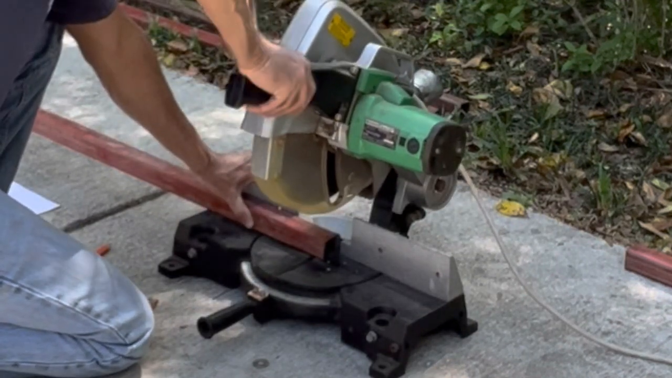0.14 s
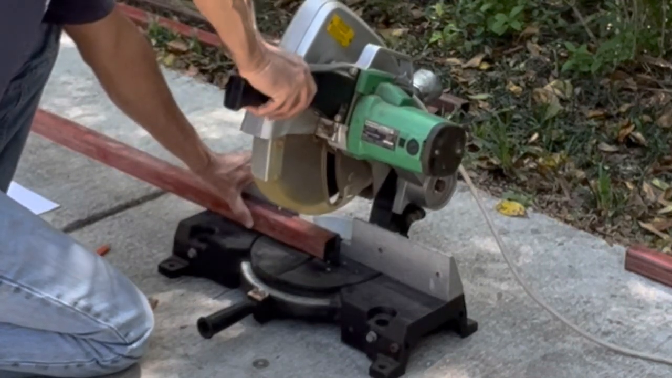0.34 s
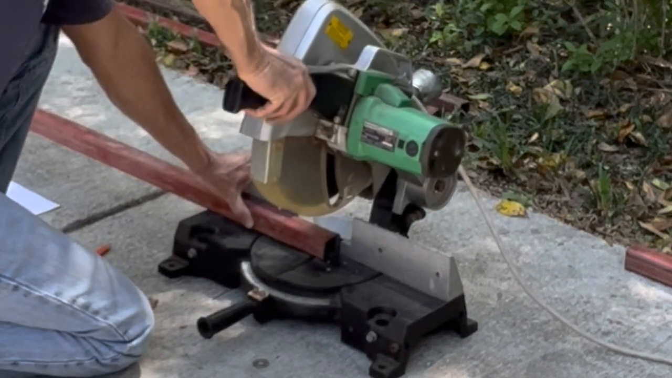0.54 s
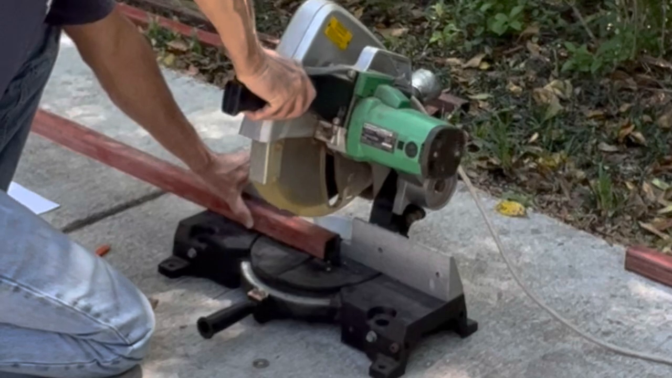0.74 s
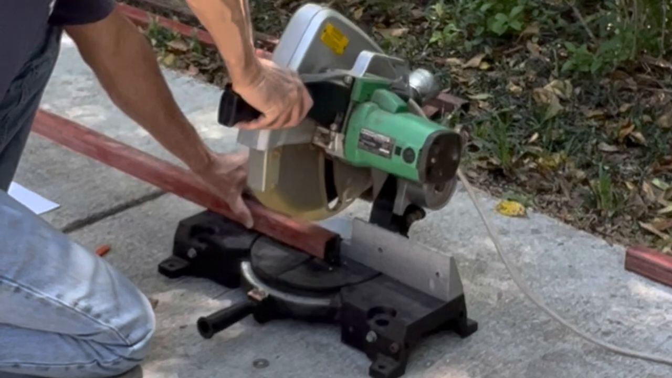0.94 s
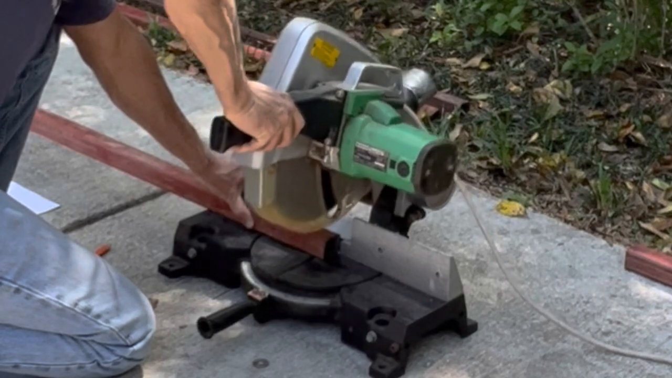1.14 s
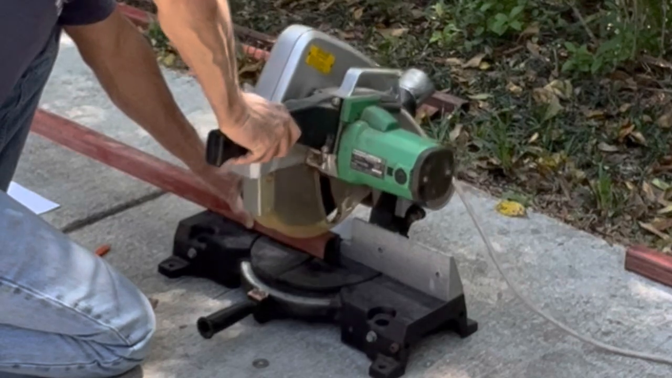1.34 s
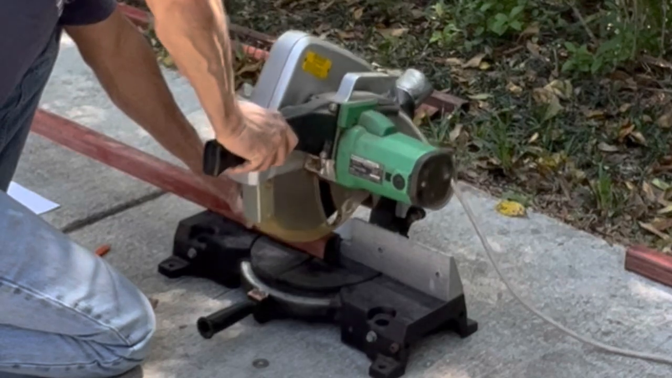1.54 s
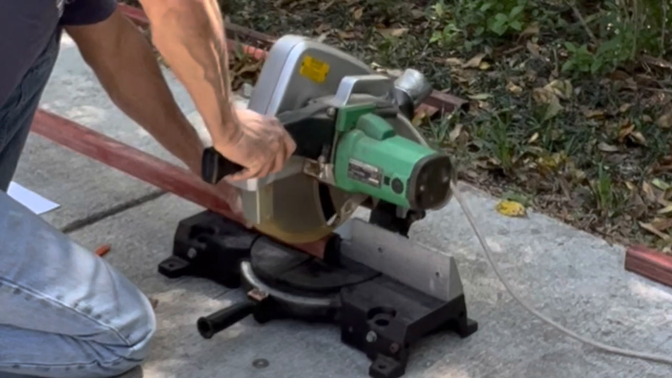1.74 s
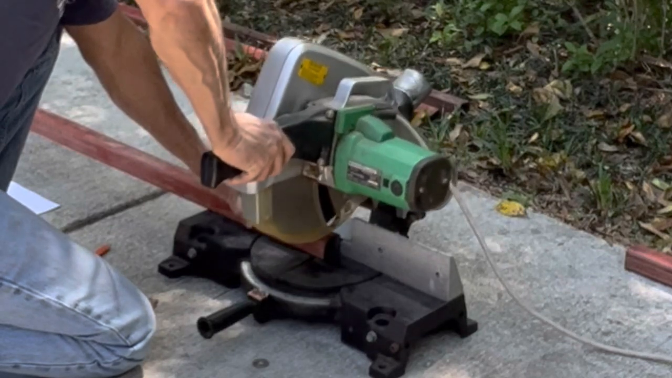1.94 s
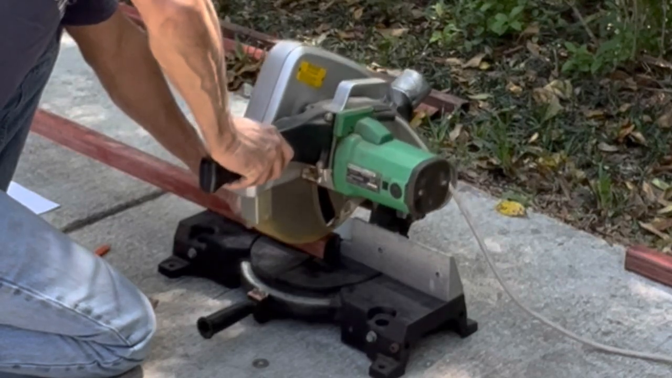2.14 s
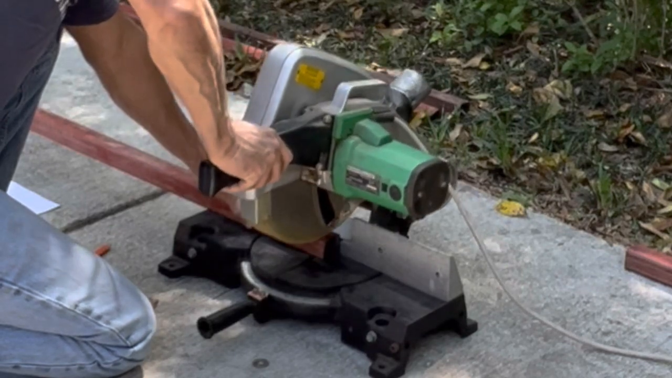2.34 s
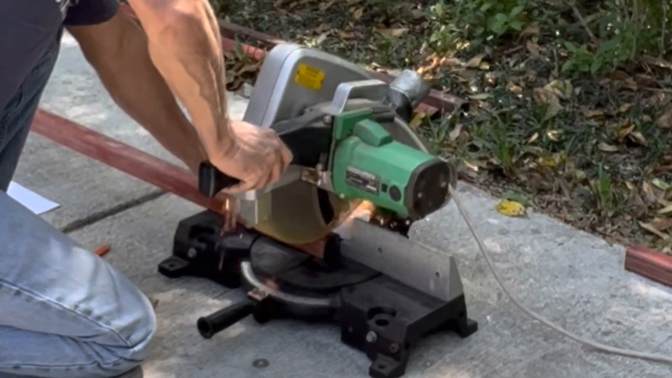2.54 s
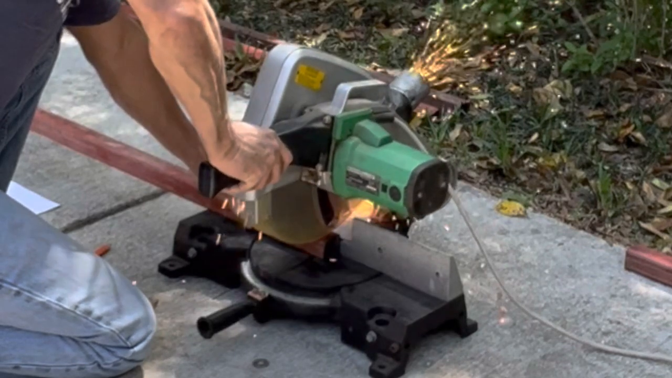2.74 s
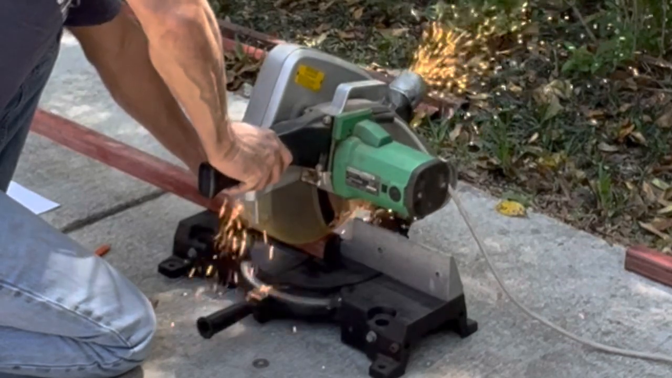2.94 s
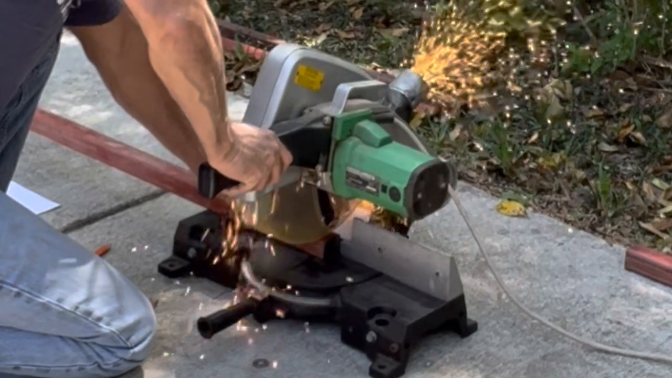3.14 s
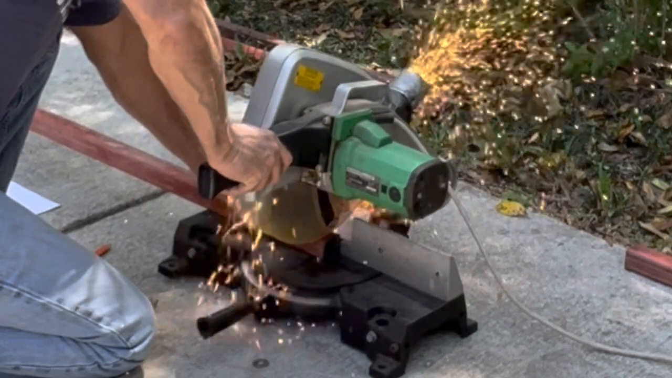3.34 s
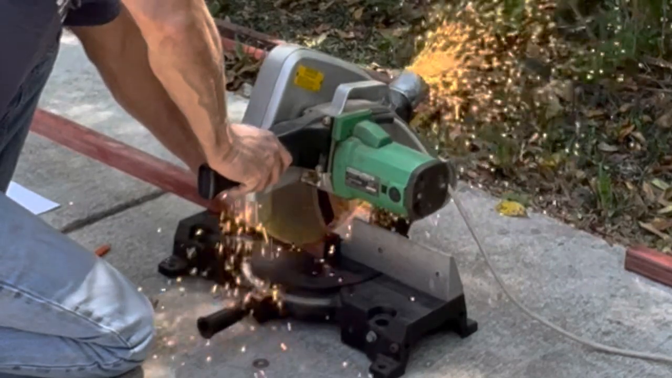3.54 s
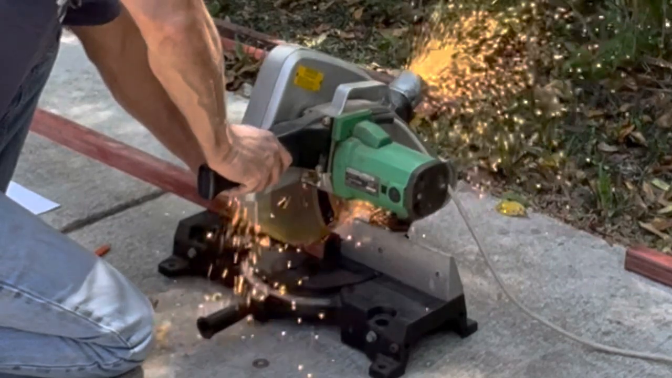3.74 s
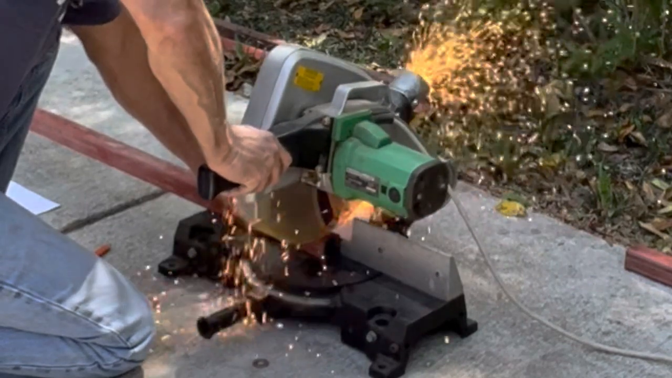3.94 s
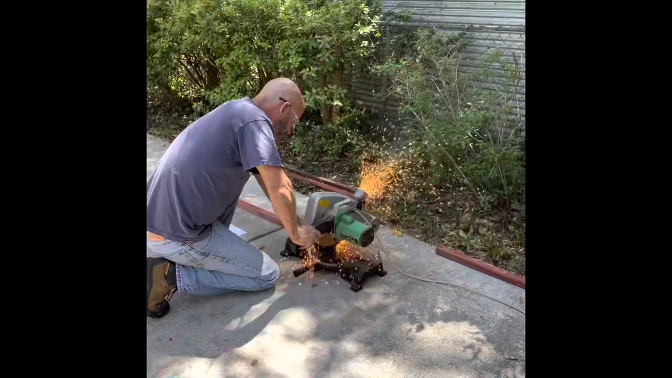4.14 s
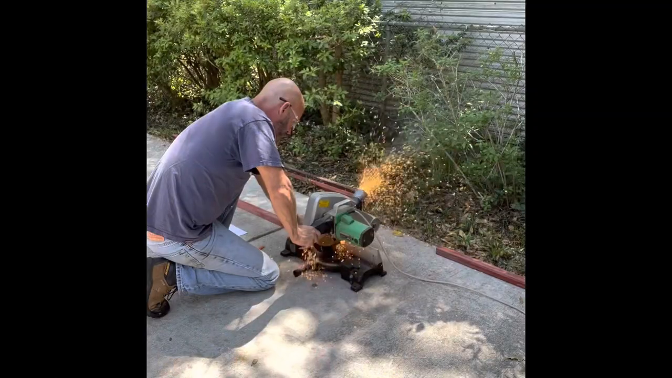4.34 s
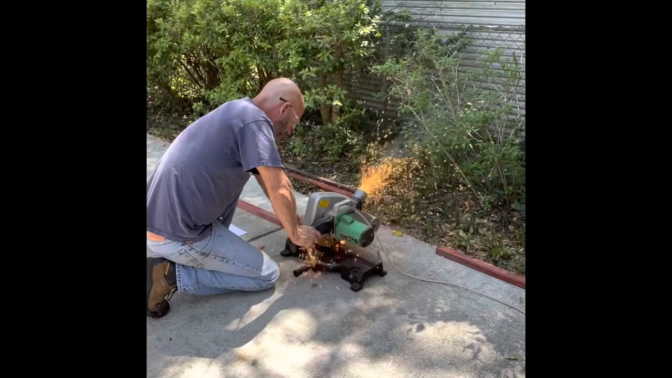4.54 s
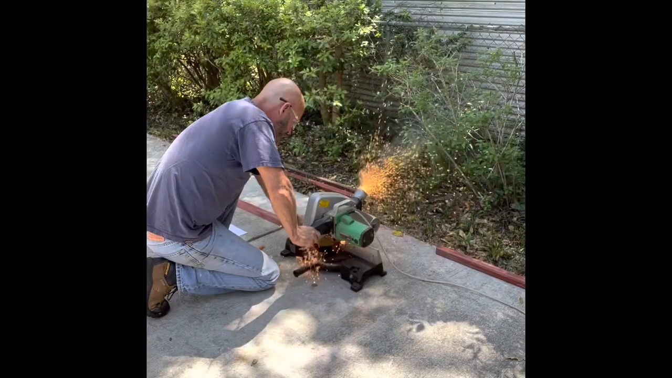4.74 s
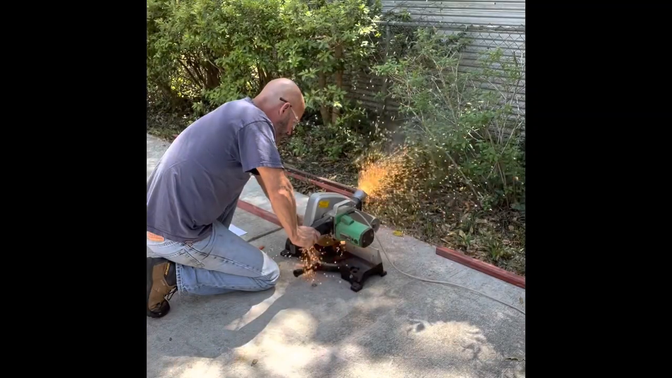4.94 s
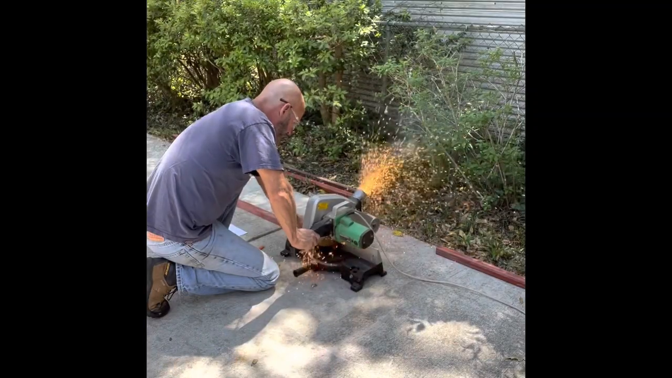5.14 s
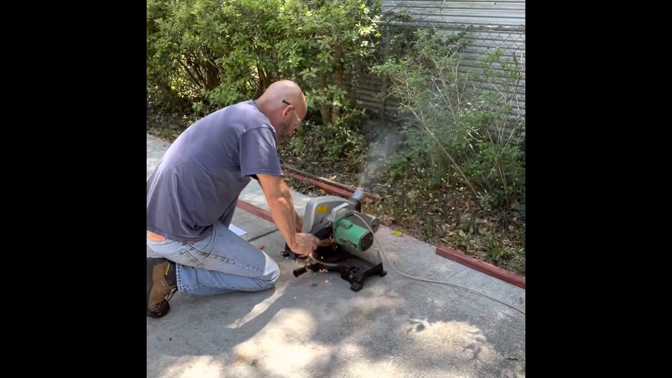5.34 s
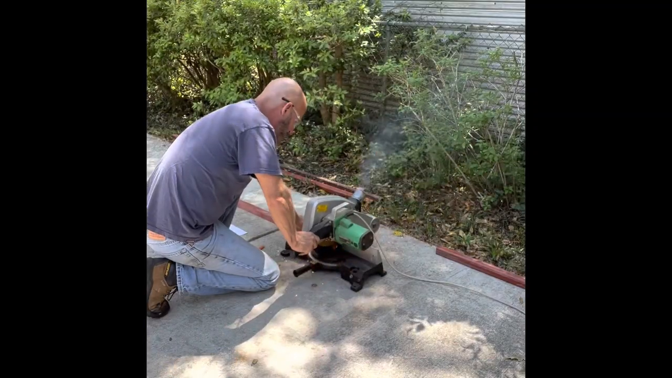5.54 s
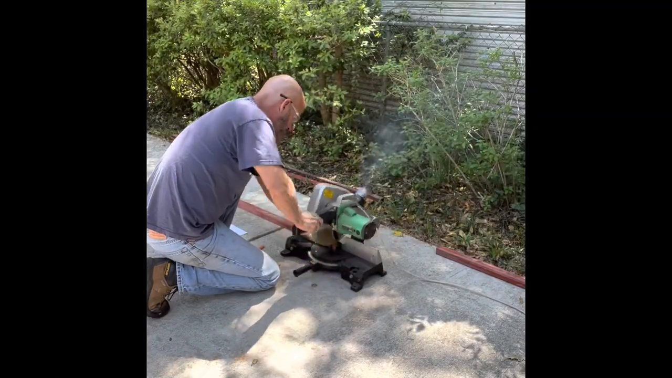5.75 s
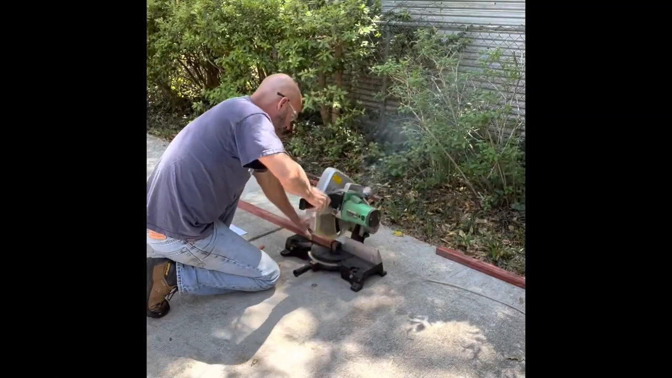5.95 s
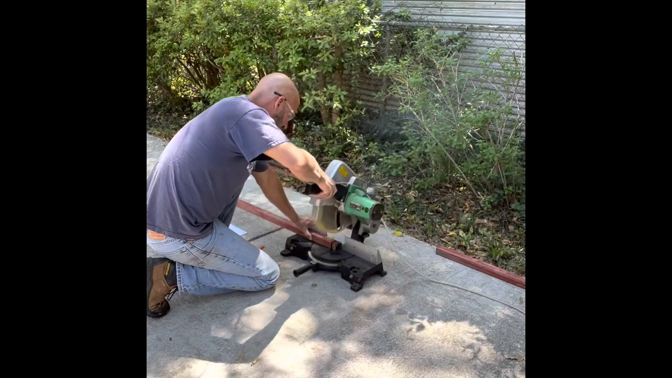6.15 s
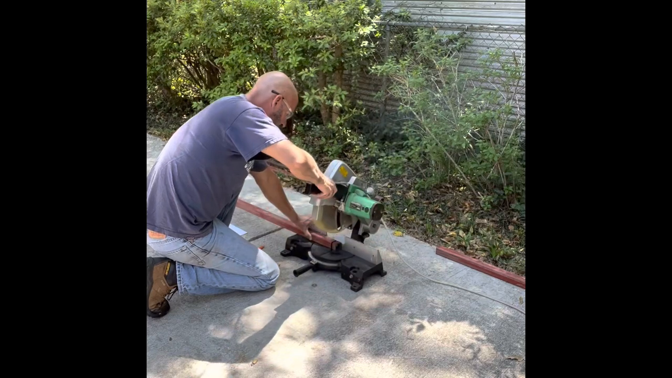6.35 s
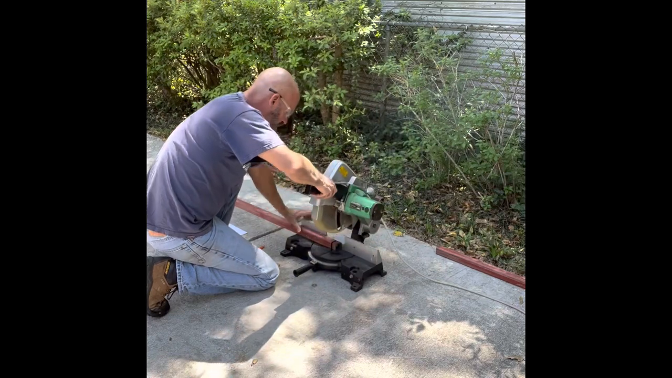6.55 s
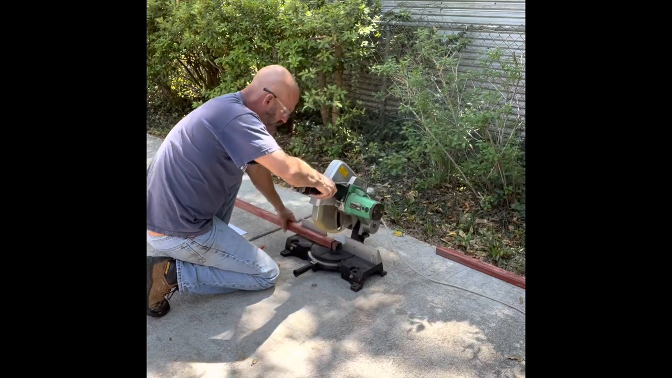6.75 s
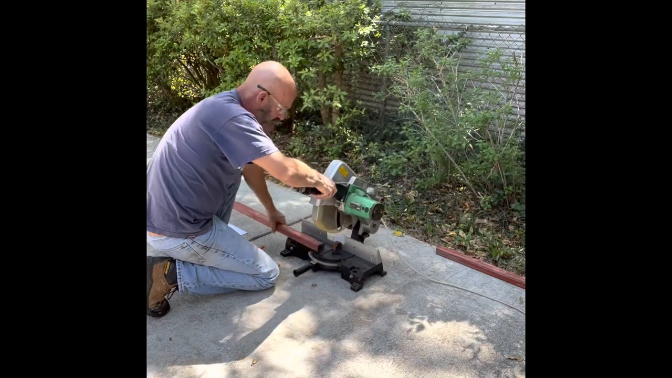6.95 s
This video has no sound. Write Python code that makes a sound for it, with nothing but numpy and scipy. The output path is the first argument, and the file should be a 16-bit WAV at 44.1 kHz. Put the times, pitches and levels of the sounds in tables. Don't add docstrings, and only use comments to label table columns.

```python
import sys
import numpy as np
from scipy import signal
from scipy.fft import rfft, irfft, next_fast_len
from scipy.io import wavfile
from scipy.ndimage import uniform_filter1d, map_coordinates

SR = 44100
rng = np.random.default_rng(int(sys.argv[2]) if len(sys.argv) > 2 else 0)


def elevation(decibels):
    levels = np.asarray(decibels, float)
    return 10 ** (levels / 20)


def bounce(signal):
    frames = np.transpose(np.atleast_2d(signal))
    limited = np.clip(frames, -1, 1)
    pcm = np.round(limited * 32767).astype(np.int16)
    wavfile.write(sys.argv[1], SR, pcm)


N = 308655
T = np.arange(N) / SR

# time_s, rumble_db
YARD = [(0.0, -47.5), (.6, -42), (.9, -58), (2.62, -66), (3.3, -53), (4.0, -60), (4.2, -47), (5.8, -35),
        (7.0, -38)]
# time_s, level_db
DRONE = [(0, -60), (.6, -51.5), (1.0, -62.5), (4.3, -55.5), (5.0, -43.5), (6.3, -44.5), (6.6, -37.5),
         (7.0, -39)]
# frequency_hz, density_db_per_hz
RUMBLE = [(13, -38.5), (22, 14.5), (102, -3.5), (116, 2), (136, -1), (252, -26), (400, -16), (520, -58),
          (880, -120)]
# frequency_hz, density_db_per_hz
LEAVES = [(120, -17), (200, -10.5), (440, -8), (1040, -10.5), (1480, -21), (3100, -26), (7180, -50),
          (12000, -40.5), (15600, -78), (22000, -120)]

# start_s, peak_db, crack_db
CLICKS = [
    (0.219, -10.5, -18),
    (0.309, -32, -33),
    (0.403, -13, -17),
    (0.569, -27, -30.5),
    (0.594, -43, -13),
    (0.624, -25, -15),
]
# frequency_hz, level_db, t60_s
HANDLE = [(1030, -6.5, 0.066), (1346, -9, 0.038), (2520, 5.5, 0.013), (2810, -6.5, 0.051),
          (4800, -15.5, 0.03), (7100, -17, 0.032)]
# start_s, peak_db, crack_db
KICKS = [(0.638, 0, -25), (0.66, -3, -19), (0.679, -6.5, -17), (0.696, -4.5, -20), (0.711, -5, -22),
         (0.732, -10.5, -17), (0.747, -10, -19.5), (0.761, -8.5, -22), (0.778, -9.5, -20.5),
         (0.8, -19, -17), (0.818, -28, -8)]
# frequency_hz, level_db
KNOCK = [(450, -12), (820, -32), (1090, 1.5), (1350, -13), (1830, -4.5)]

START_S, BITE_S, CHANGE_S, FREE_S, BRAKE_S = .63, 2.35, 4.105, 5.1, 5.73
FREE_SPEED_HZ, RECOVER_S = 383.3, 4.925
# shortfall_hz, time_constant_s
RUN_UP = [(193.9, .506), (149.9, .124)]
# speed_hz, time_constant_s
BRAKING = [(16, .035), (290, .286), (38.5, 1.5)]
# time_s, turns_hz
LOADED = [
    [(2.35, 376.5), (2.6, 366), (3.0, 337), (3.4, 293), (3.8, 257), (4.09, 245)],
    [(4.11, 178.3), (4.6, 179.6), (4.81, 180.3), (4.94, 182.3), (5.0, 187), (5.05, 197), (5.1, 212)],
]
SLOTS, HUM_ORDER, TEETH, WHEEL_TEETH = 14, 12, 9, 46

# time_s, level_db
CURRENT = [(.63, -63), (.74, -44), (.86, -35.5), (1.05, -41.5), (1.3, -53), (3.0, -67), (3.4, -41.5),
           (4.1, -59), (4.105, -24.5), (5.12, -24), (5.3, -31), (5.44, -44), (5.72, -41), (5.74, -24),
           (5.88, -29.5), (6.04, -40), (6.13, -70), (6.6, -64)]
# frequency_hz, width_hz, level_db
CASE = [(421, 58, -7), (1070, 600, 0), (1640, 112, 11), (2500, 440, 12), (3056, 266, 8.5),
        (3940, 290, 11.5)]
# frequency_hz, width_hz, level_db
HOUSING = [(438, 65, -3.5), (808, 30, 5), (1168, 300, -5), (2070, 30, -15), (2510, 78, -25),
           (3470, 95, 2.5), (4680, 390, -12.5), (5900, 160, -22)]
# frequency_hz, width_hz, level_db
LOOSE = [(400.6, 8.9, 6.5), (1050, 62, 10), (1808, 45, 11), (2780, 49, 8), (3605, 82, -1.5),
         (4640, 42, -29), (6100, 57, -28), (6700, 68, 6.5)]
# frequency_hz, density_db_per_hz
AIR = [(200, -17.5), (330, -10.5), (600, -9), (1400, -4.5), (2200, -4.5), (3000, 4), (4000, -4), (5500, -6),
       (7000, -4.5), (8500, -3.5), (10500, -10), (12500, -10), (14000, -14), (14500, -41.5)]
# frequency_hz, density_db_per_hz
COAST = [(200, -4), (330, -4), (600, -1), (1400, -5), (2200, -6.5), (3000, -13.5), (4000, -15),
         (5500, -15.5), (7000, -14), (8500, -11), (10500, -18.5), (12500, -24), (14000, -32.5),
         (14500, -44)]
# start_s, end_s, rumble_db, rumble_slope_db_per_octave, air_db, air_slope_db_per_octave
STAGES = [
    (0.652, 2.31, -23.5, 4.5, -26, 12.5),
    (5.2, 5.84, -18, 10.5, -21, 14),
    (5.833, 7.0, -24.5, 3.5, -22.5, 7),
]
PULL_HZ = 120
THROB_AT_0_DB, THROB_PER_DB = 1.54, .024
GEAR_DB, PULL_ON_HUM_DB = -12, -14.5
HUM_DB, HUM_KNEE_HZ, HUM_DB_PER_OCTAVE = -32, 330, 70
HUM_SMOTHER_DB_PER_S = -16
POWERED_AFTER_DB, HUM_AFTER_DB = 1, -2
UNLOADED_MESH_DB, UNLOADED_MESH_DB_PER_OCTAVE, UNLOADED_MESH_WIDTH_HZ = -25.5, 38, 380
JOLT_DB, JOLT_S = -10, 0.16

# start_s, extra_db, length_s
FLARES = [
    (6.081, 7, .018),
    (6.285, 7, .014),
    (6.414, 12, 0.015),
]
SLACK_DB, SLACK_RISE_S = -37, 0.027
SLACK_HOLD_S, SLACK_DB_PER_S = 6.31, -32
FIRST_TAP_DB, OVERTONE_DB_PER_OCTAVE = 3, -1.5
SHARPER_DB_PER_OCTAVE, SCATTER_DB = 5, 4
VENTS_HZ, VENTS_DB = 3300, -6

# time_s, feed_db, growl_over_hiss_db
CUTS = [
    [(2.3, -37, -20), (2.358, -22, -13.5), (2.49, -23, -4.5), (2.94, -18.5, -5.5), (3.2, -19, -5.5),
     (3.386, -21, -5.5), (3.47, -17, -7), (3.7, -21.5, -3), (4.05, -21, -4.5)],
    [(4.22, -14.5, -6.5), (4.86, -15.5, -6), (4.99, -15.5, -5), (5.03, -9, -10.5), (5.095, -7, -9.5),
     (5.12, -20.5, 6.5), (5.21, -31.5, 2.5), (5.29, -17.5, -10), (5.36, -37, 5)],
]
# frequency_hz, width_hz, level_db
TUBE = [(453, 46, -5), (935, 90, 2), (1790, 30, -5.5), (2776, 100, 4), (3230, 1200, -21), (3630, 110, 5),
        (4366, 133, 9.5), (5130, 135, 12), (6200, 240, -5), (6760, 55, 2), (7600, 34, -7), (8800, 70, -26),
        (10270, 370, -4.5), (11350, 370, 3)]
# frequency_hz, width_hz, level_db
TUBE_DEEP = [(459, 57, -2), (874, 16.5, 9), (967, 26.5, 7), (1709, 39, 6.5), (3400, 79, -8),
             (4600, 49, -31), (5120, 780, -8.5), (5960, 83, -18)]
# frequency_hz, density_db_per_hz
GRIT = [(200, -19.5), (330, -3.5), (600, -4.5), (1400, 0), (2200, -6.5), (3000, 3.5), (4000, -7),
        (5500, -8), (7000, 2.5), (8500, 5.5), (10500, -11.5), (12500, -8), (14000, -6.5), (14500, -66)]
# frequency_hz, density_db_per_hz
GRIT_DEEP = [(200, -8.5), (330, -7), (600, 0.5), (1400, -2), (2200, -3.5), (3000, 0.5), (4000, -6),
             (5500, -7.5), (7000, 0.5), (8500, -1), (10500, -3.5), (12500, -5), (14000, -13), (14500, -3.5)]
# start_s, growl_db, hiss_db, length_s
SNAGS = [
    (4.867, -14, -38, 0.015),
    (5.163, -21, -7, 0.0057),
    (5.183, -19, -15, 0.0055),
    (5.206, -30, -12, 0.0038),
    (5.226, -32, -10.5, 0.0038),
    (5.275, -22, -36, 0.0089),
    (5.414, -28, -38, 0.0033),
    (5.477, -26, -16, 0.0078),
]
# time_s, level_db
WHEEL = [(1.2, -67), (1.4, -56), (2.0, -52), (2.7, -47), (3.3, -44.5), (3.7, -58.5), (4.0, -56)]

# frequency_hz, gap_db, lead_rad, scatter_db
STEREO_SPREAD = [(350, 0, .2, -13), (600, 5, 0, -20), (1100, 5, 0, -16), (1550, 0, -.1, -14), (2250, 0, 0, -12),
                 (2650, -1, -2.1, -8), (4300, -9, -2.5, -3), (5200, -4, -4.6, -3), (6000, -9, -5.9, -3),
                 (7250, -2.5, -3.14, -9), (8450, 0, -3.0, -17), (10700, 0, 0, -24), (12800, 0, 0, -13),
                 (13900, 0, 3.14, -7)]
# time_s, gain
CHANGE = [
    (4.05, 1),
    (4.102, 0.046),
    (4.108, 0.021),
    (4.22, 1),
]


def unit(x):
    return x / np.sqrt(np.mean(x ** 2) + 1e-20)


def along(points, hz):
    f, *cols = np.transpose(points)
    return np.squeeze([np.interp(np.log(hz + 1), np.log(f + 1), c) for c in cols])


def curves(rows, outside=None):
    s, *cols = np.transpose(rows)
    return np.array([np.interp(T, s, c, outside, outside) for c in cols])


def wobble(rate):
    knots = rng.standard_normal(int(N * rate / SR) + 4)
    return map_coordinates(knots, [T * rate])


def bump(s, length):
    u = np.maximum(T - s, 0)
    return (1 - np.exp(-u / 0.0012)) * np.exp(-(u / length) ** 2)


def filtered(x, response):
    m = next_fast_len(N + SR // 2)
    return irfft(rfft(x, m) * response(np.fft.rfftfreq(m, 1 / SR)), m)[..., :N]


def split(f, hz):
    return 1 / (1 + (f / hz) ** 6)


def bands(x, hz=2200):
    both = filtered(x, lambda f: np.array([split(f, hz), 1 - split(f, hz)]))
    return [unit(v) for v in both]


def modes(peaks, f, between_db):
    total = elevation(between_db)
    for k, (c, width, db) in enumerate(peaks):
        resonance = 1j * f * width / (c * c - f * f + 1j * f * width)
        total = total + (-1) ** k * elevation(db) * resonance
    return total


def hiss(response, patchy_db):
    z = signal.stft(rng.standard_normal(N + 512), nperseg=512)[2]
    field = uniform_filter1d(rng.standard_normal(z.shape), 5, 0)
    field = unit(uniform_filter1d(field, 8, 1))
    noise = signal.istft(z * elevation(patchy_db * field), nperseg=512)[1][:N]
    return unit(filtered(noise, response))


def yard():
    rumble_gain = elevation(curves(YARD)[0] + 3.0 + 2.4 * wobble(5.04))
    rumble = rumble_gain * hiss(lambda f: elevation(along(RUMBLE, f)), patchy_db=1.0)
    firing = 2 * np.pi * np.cumsum(105.5 + 2.27 * wobble(7.8)) / SR
    drone = elevation(curves(DRONE)[0] + 1.6 * wobble(9)) * (np.sin(firing) + .3 * np.sin(2 * firing))
    leaves = elevation(-57.0) * hiss(lambda f: elevation(along(LEAVES, f)), patchy_db=3.0)
    return rumble + np.sqrt(2) * drone + leaves


def breeze():
    def puffs():
        return elevation(2.0 * wobble(2.8)) * hiss(lambda f: split(f, 56) * (1 - split(f, 35)), patchy_db=1.5)
    return elevation(curves(YARD)[0] - 9) * np.array([puffs(), puffs()])


def trigger():
    out, t = np.zeros(N), np.arange(SR // 6) / SR
    for s, db, crack_db in CLICKS:
        ring = 0
        for hz, level, t60 in HANDLE:
            decay = elevation(level + rng.normal(0, 3.2) - 60 * t / t60)
            jitter = 1.36 * np.cumsum(rng.normal(0, 0.08, len(t)))
            ring = ring + decay * np.sin(2 * np.pi * hz * t + jitter)
        crack = elevation(crack_db + 12.0 - 60 * t / 0.011) * rng.standard_normal(len(t))
        attack = 1 - np.exp(-t / 0.0015)
        out[round(s * SR):][:len(t)] += elevation(db - 12.0) * (ring + crack) * attack
    return out


def kicks():
    knocks, cracks, t = np.zeros(N), np.zeros(N), np.arange(SR // 30) / SR
    for s, db, crack_db in KICKS:
        shape = elevation(db) * (t / .004 * np.exp(1 - t / 0.0039)) ** 2
        ring = 0
        for hz, level in KNOCK:
            gain = elevation(level + rng.normal(0, 1.1))
            pitch_hz = hz * (1 + rng.normal(0, 0.024))
            ring = ring + gain * np.sin(2 * np.pi * (pitch_hz * t + rng.random()))
        knocks[round(s * SR):][:len(t)] += shape * ring
        cracks[round(s * SR):][:len(t)] += elevation(crack_db) * shape * rng.standard_normal(len(t))
    bright = filtered(cracks, lambda f: (1 - split(f, 1400)) * elevation(along(AIR, f)))
    return elevation(-5.5) * knocks + elevation(13) * bright


def backlash(hz, turns):
    late, taps = T > BRAKE_S, np.zeros(N)
    sharper_db = SHARPER_DB_PER_OCTAVE * np.log2(hz[late] / 90)
    for k in range(1, 18):
        level_db = FIRST_TAP_DB if k == 1 else sharper_db
        level_db = level_db + OVERTONE_DB_PER_OCTAVE * np.log2(k) + SCATTER_DB * wobble(30)[late]
        tone = np.sin(k * TEETH * turns[late] + k * k)
        taps[late] += elevation(level_db) * tone * split(k * TEETH * hz[late], hz=8500)
    slack_db = SLACK_DB + SLACK_DB_PER_S * np.maximum(T - SLACK_HOLD_S, 0)
    slack_db = slack_db + sum(db * bump(s, length) for s, db, length in FLARES)
    slack = elevation(slack_db) * np.clip((T - BRAKE_S) / SLACK_RISE_S, 0, 1)

    def housing_and_vents(f):
        return modes(LOOSE, f, between_db=-9.5) + elevation(VENTS_DB) * (1 - split(f, VENTS_HZ))
    return filtered(slack * taps, housing_and_vents)


def speed():
    def free(s):
        return FREE_SPEED_HZ - sum(hz * np.exp(-np.maximum(T - s, 0) / lag) for hz, lag in RUN_UP)
    braked = sum(hz * np.exp(-np.maximum(T - BRAKE_S, 0) / lag) for hz, lag in BRAKING)
    loaded = curves(np.vstack(LOADED))[0]
    return np.select([T < BITE_S, T < FREE_S, T < BRAKE_S], [free(START_S), loaded, free(RECOVER_S)], braked)


def motor_tones(hz, turns, live, throb):
    current_db, = curves(CURRENT)
    octaves = np.log2(hz / FREE_SPEED_HZ)
    grid = np.arange(0, SR // 8, 10.)
    case_gain = np.abs(modes(CASE, grid, between_db=2.5))

    def case(order):
        return np.interp(order * hz, grid, case_gain)
    pull_phase = 2 * np.pi * PULL_HZ * T
    pull = 1 + throb * (np.cos(pull_phase) + .4j * np.sin(pull_phase))
    whine_gain = case(SLOTS) * elevation(current_db + 1.4 * wobble(25))
    whine = whine_gain * np.real(pull * np.exp(1j * SLOTS * turns))
    mesh_gain = case(TEETH) * elevation(current_db + GEAR_DB + 1.7 * wobble(46))
    mesh = mesh_gain * np.real(pull * np.exp(1j * TEETH * turns))

    changed = T > CHANGE_S
    smother_db = HUM_SMOTHER_DB_PER_S * np.maximum(T - BITE_S, 0)
    powered = live * elevation(np.where(changed, POWERED_AFTER_DB, smother_db))
    knee_db = HUM_DB_PER_OCTAVE * np.minimum(np.log2(hz / HUM_KNEE_HZ), 0)
    hum_gain = powered * elevation(HUM_DB + HUM_AFTER_DB * changed + knee_db)
    hum_gain = hum_gain + case(HUM_ORDER) * elevation(current_db + PULL_ON_HUM_DB)
    hum_tone = np.sin(HUM_ORDER * turns) + elevation(-10) * np.sin(2 * SLOTS * turns)
    hum = hum_gain * elevation(1.2 * wobble(20)) * hum_tone

    blur = wobble(UNLOADED_MESH_WIDTH_HZ) * np.sin(TEETH * turns)
    blur = blur + wobble(UNLOADED_MESH_WIDTH_HZ) * np.cos(TEETH * turns)
    unloaded = powered * elevation(UNLOADED_MESH_DB + UNLOADED_MESH_DB_PER_OCTAVE * octaves) * blur
    return np.sqrt(2) * (whine + mesh + hum) + unloaded


def motor(hz, turns):
    octaves = np.log2(hz / FREE_SPEED_HZ)
    live = uniform_filter1d(1. * (T < BRAKE_S), size=SR // 50)
    throb = live * np.clip(THROB_AT_0_DB + THROB_PER_DB * curves(CURRENT)[0], 0, .9)
    out = motor_tones(hz, turns, live, throb)
    rattle = elevation(0.26 * wobble(70) + 1.0 * throb * np.cos(2 * np.pi * PULL_HZ * T))
    jolt = elevation(JOLT_DB) * bump(START_S, JOLT_S)
    bodies, colours = (HOUSING, HOUSING, LOOSE), (AIR, AIR, COAST)
    beds_db, fades_s = (-9, -5, -7), (.6, .08, .06)
    for stage, body, colour, bed_db, fade in zip(STAGES, bodies, colours, beds_db, fades_s):
        s0, s1, low_db, low_slope, high_db, high_slope = stage
        swell = [(s0 - .03, -22), (s0, 0), (s1, 0), (s1 + fade, -16)]
        on = elevation(curves(swell, -120)[0])
        noise = hiss(lambda f: elevation(along(colour, f)) * modes(body, f, bed_db), patchy_db=2.0)
        rumble, air = bands(noise)
        rumble_gain = np.hypot(elevation(low_db + low_slope * octaves), jolt) * elevation(-4.0)
        out += on * rumble_gain * unit(rattle * rumble)
        out += on * elevation(high_db + high_slope * octaves + 1.2 + 1.2 * wobble(60)) * air
    return out


def grinding(turns):
    wheel, out = turns * TEETH / WHEEL_TEETH, np.zeros(N)
    first, second = CUTS
    held = [*first, (CHANGE_S, *first[-1][1:])], [(CHANGE_S, *second[0][1:]), *second]
    catches = sum(elevation([[low_db], [high_db]]) * bump(s, length) for s, low_db, high_db, length in SNAGS)
    each_cut = zip(held, (TUBE, TUBE_DEEP), (GRIT, GRIT_DEEP), (0 * catches, catches))
    for rows, tube, grit, catch in each_cut:
        feed_db, growl_db = curves(rows, -120)
        feed_db = feed_db + .7 * wobble(9)
        press = 0.36 * np.sin(wheel) + 0.42 * np.sin(2 * wheel) + 0.18 * wobble(50)
        noise = hiss(lambda f: elevation(along(grit, f)) * modes(tube, f, between_db=-9), patchy_db=-1.0)
        growl, spark = bands(noise)
        out += (elevation(feed_db + growl_db) + catch[0]) * unit(elevation(press + 0.59 * wobble(90)) * growl)
        out += (elevation(feed_db) + catch[1]) * unit(elevation(press + 2.0 * wobble(200)) * spark)
    shake = np.sin(wheel) + 0.25 * np.sin(2 * wheel) + 0.37 * np.sin(3 * wheel)
    return out + np.sqrt(2) * elevation(curves(WHEEL, -120)[0]) * shake


def stereo_spread(x):
    def pair(f):
        gap_db, lead, _ = along(STEREO_SPREAD, f)
        return np.array([elevation(gap_db / 2) * np.exp(.5j * lead), elevation(-gap_db / 2) * np.exp(-.5j * lead)])
    t = np.arange(SR // 4) / SR
    scatter = rng.standard_normal((2, len(t))) * elevation(-60 * t / 0.19)
    scatter = scatter / np.linalg.norm(scatter[0])
    diffuse = signal.fftconvolve(x[None], scatter, axes=1)[:, :N]
    return filtered(x, pair) + filtered(diffuse, lambda f: elevation(along(STEREO_SPREAD, f)[2]))


def scene():
    hz = uniform_filter1d(speed(), size=SR // 50)
    turns = 2 * np.pi * np.cumsum(hz * (1 + .0015 * wobble(60))) / SR
    saw = (T > START_S) * motor(hz, turns) + backlash(hz, turns) + grinding(turns) + kicks()
    return (stereo_spread(saw + trigger() + yard()) + breeze()) * curves(CHANGE)


def band_limit(x):
    return signal.sosfilt(signal.butter(12, 14290, fs=SR, output="sos"), x)


def record(dry):
    thinned = filtered(dry, lambda f: 1 - split(f, 46.0))
    return band_limit(np.clip(thinned, -1, 1))


dry = scene()
out = record(dry)
bounce(out)
```